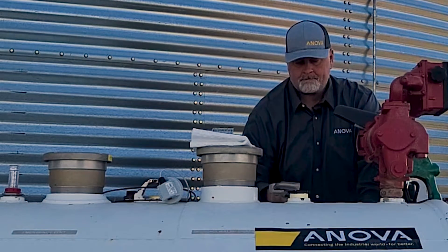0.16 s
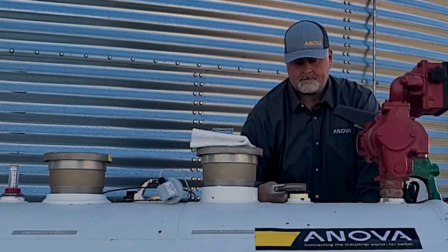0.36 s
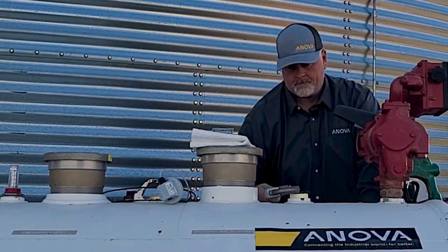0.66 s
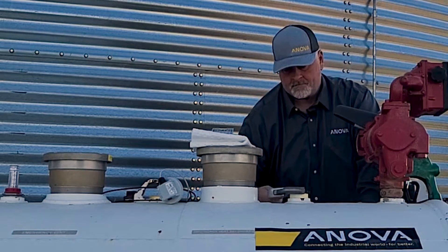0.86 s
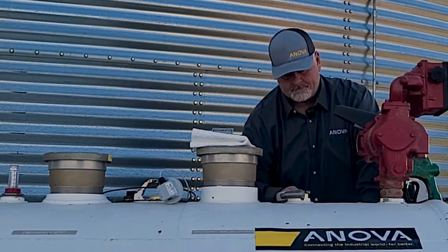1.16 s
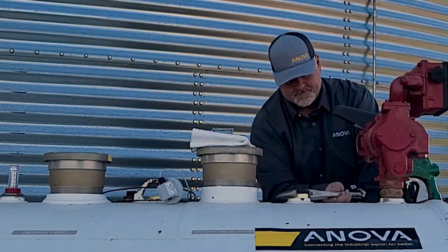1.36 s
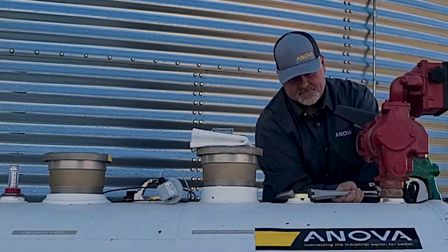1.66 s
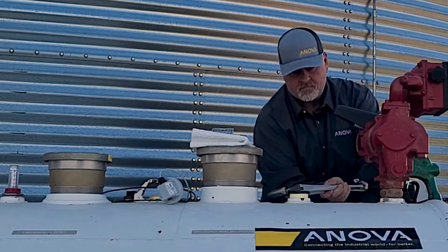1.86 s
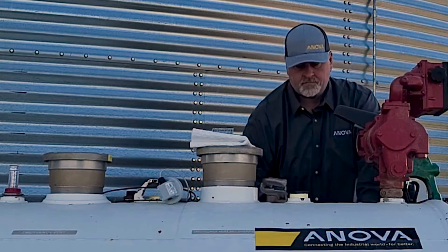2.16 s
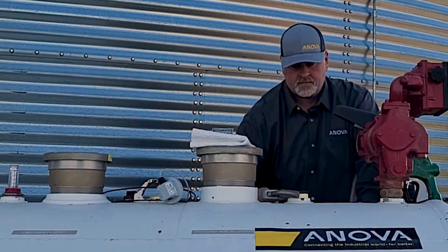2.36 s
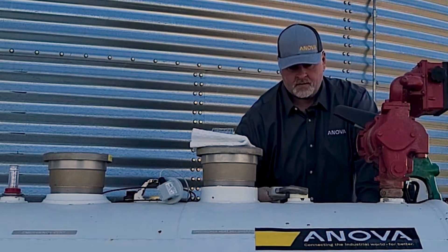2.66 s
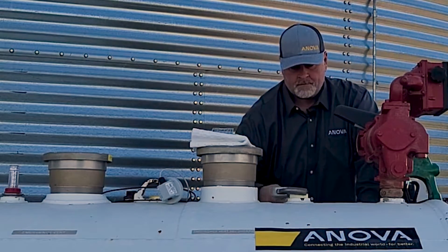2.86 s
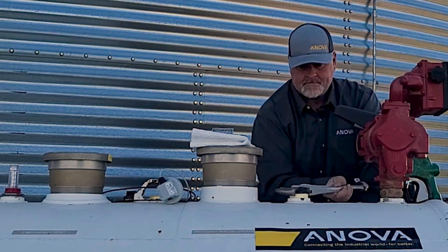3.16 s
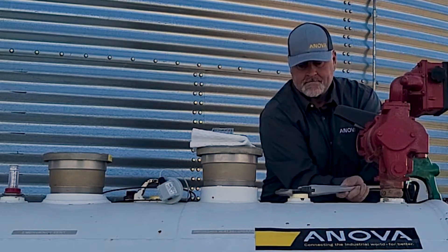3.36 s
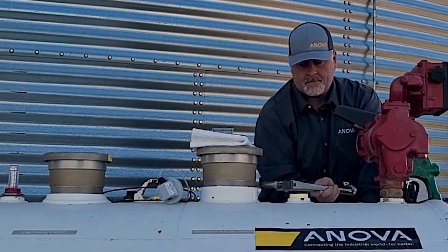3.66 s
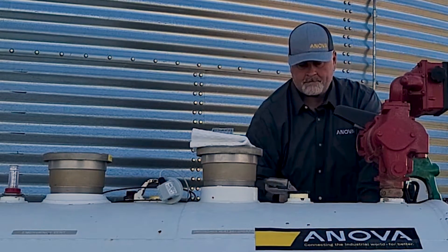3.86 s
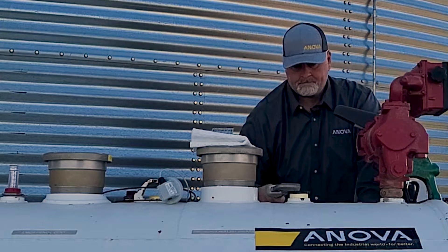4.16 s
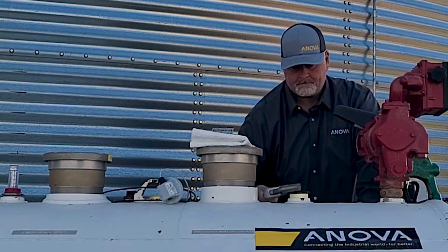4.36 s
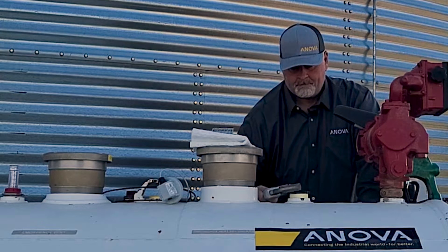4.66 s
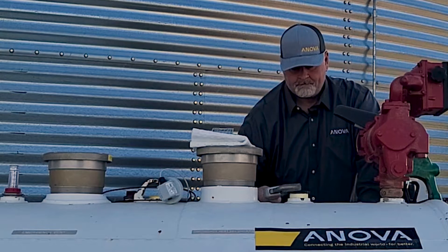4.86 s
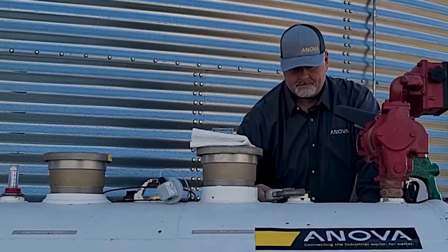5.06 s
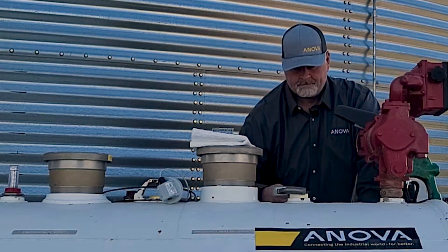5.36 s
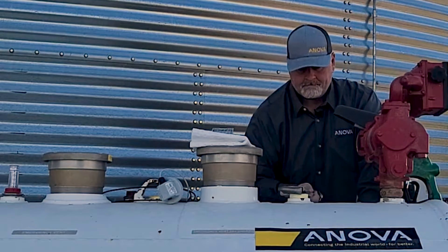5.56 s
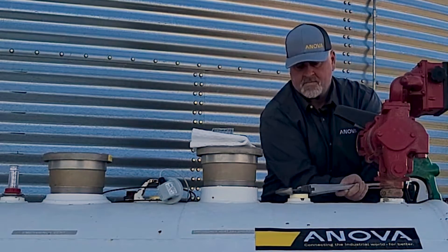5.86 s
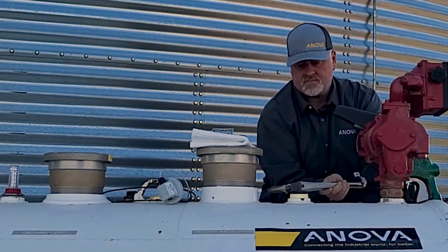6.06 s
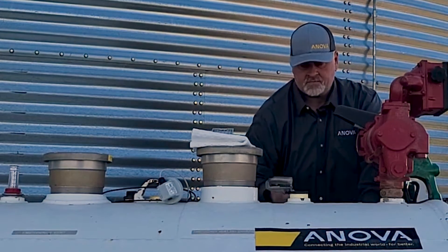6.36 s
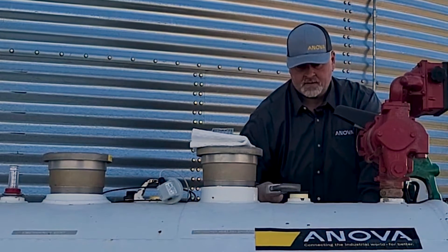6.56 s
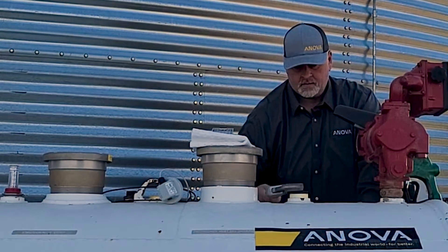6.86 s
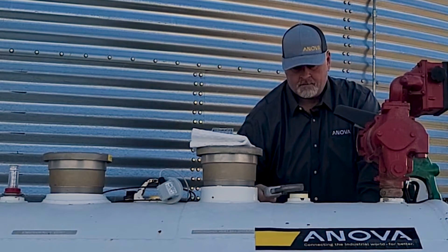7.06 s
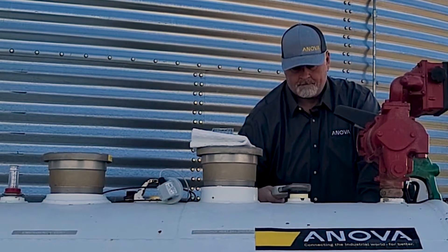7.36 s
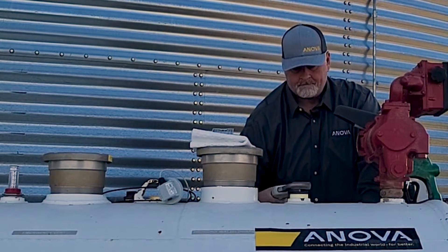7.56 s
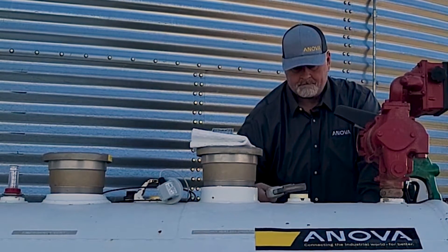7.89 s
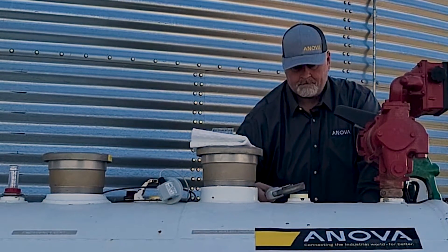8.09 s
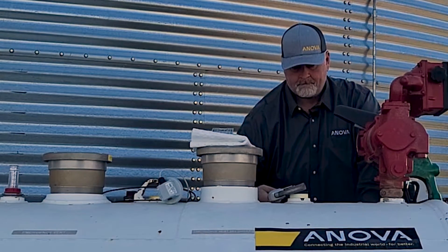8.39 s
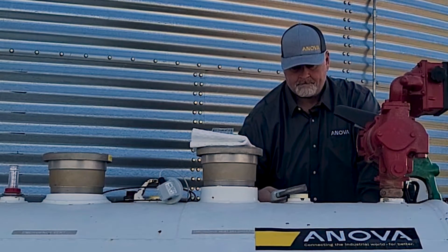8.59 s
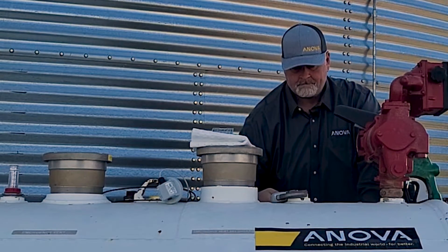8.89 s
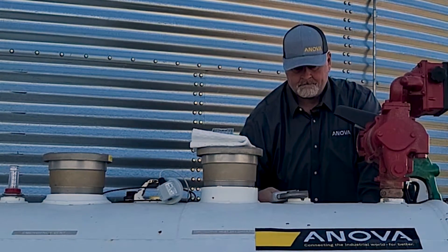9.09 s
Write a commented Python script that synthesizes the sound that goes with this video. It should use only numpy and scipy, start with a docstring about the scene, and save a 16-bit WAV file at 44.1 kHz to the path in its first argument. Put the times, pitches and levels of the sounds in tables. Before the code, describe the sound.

Dull booming metal knocks and loose wrench rattles come in uneven bursts over low wind thumps, then a stuck thread bangs loudly through the tank.

```python
"""Outdoors beside a corrugated steel wall, a pipe wrench tightens an adapter on top of a steel fuel tank.
Each bite knocks through the fitting and excites the modes of the tank shell, while the teeth scrape.
The loose jaw and handle rattle and ring, and the adjusting nut snaps as a click in two narrow resonances.
An earlier slip of the thread dies away at the start; at the end the loaded thread bangs three times.
Filtered noise gives the gusts that buffet the microphone and the quiet, steady hum and hiss."""
import sys
import numpy as np
from scipy import signal
from scipy.fft import rfft, irfft
from scipy.io import wavfile
from scipy.ndimage import uniform_filter1d

SR = 44100
rng = np.random.default_rng(int(sys.argv[2]) if len(sys.argv) > 2 else 0)


def waveform_to_disk(signal):
    """Save audio, clipped to [-1, 1], as 16-bit WAV at the path in sys.argv[1]."""
    frames = np.transpose(np.atleast_2d(signal))
    scaled = np.clip(frames, -1, 1) * 32767
    samples = np.round(scaled).astype(np.int16)
    wavfile.write(sys.argv[1], SR, samples)


N = 407043


def undb(db):
    """Level: decibels to amplitude gain."""
    return 10 ** (np.asarray(db) / 20)


def unit(x):
    """Normalisation: scale to rms 1."""
    return x / np.sqrt(np.mean(x ** 2) + 1e-20)


def at(points, hz):
    """Interpolation: read (frequency, value) points on a logarithmic frequency axis."""
    point_hz, values = np.transpose(points)
    return np.interp(np.log(np.maximum(hz, 1)), np.log(point_hz), values)


def colour(x, points):
    """Minimum-phase filtering: the folded cepstrum gives a causal filter of the (Hz, dB) shape."""
    size = 4096
    log_gain = at(points, np.fft.rfftfreq(size, 1 / SR)) * np.log(10) / 20
    cepstrum = irfft(log_gain)
    cepstrum[1:size // 2] *= 2
    cepstrum[size // 2 + 1:] = 0
    impulse_response = irfft(np.exp(rfft(cepstrum)))
    return signal.fftconvolve(x, impulse_response)[:len(x)]


def add(out, start_s, x):
    """Superposition: mix x into out from a time that may lie before the start."""
    i = int(start_s * SR)
    x, i = x[max(-i, 0):], max(i, 0)
    out[i:i + len(x)] += x[:max(N - i, 0)]


def fading_bands(decay, rise_s, size):
    """Dispersion and damping: half-octave masks and the envelope by which each builds up and decays."""
    octaves = np.log2(np.maximum(np.fft.rfftfreq(size, 1 / SR), 1))
    centres = np.arange(12, 29)[:, None] / 2  # octaves above 1 Hz
    masks = np.maximum(1 - 2 * abs(octaves - centres), 0)
    t = np.arange(size) / SR
    hz = 2 ** centres
    # bending waves are slow at low pitch, so the lows bloom late
    bloom = 1 - np.exp(-t / (rise_s + 2.0 / hz))
    fade = np.exp(-np.log(1000) * t / at(decay, hz))
    return masks, bloom * fade


def ring(modes, bands, modes_db, tick_db, blur):
    """Modal superposition: one contact gives a tick, a wash of crowded modes and clear modes above it."""
    masks, fades = bands
    size = fades.shape[1]
    t = np.arange(size) / SR
    noise_bands = irfft(masks * rfft(rng.standard_normal(size)))
    wash = (noise_bands * fades).sum(axis=0)
    hz, db, t60 = np.transpose(modes)[:, :, None]
    # every contact point favours other modes
    favour_db = 2 * rng.standard_normal(hz.shape)
    # the shifting grip makes each pitch wander, by the share blur, in steps of 256 samples
    steps = rng.standard_normal((len(hz), size // 256))
    wander = 1 + blur * np.repeat(steps, 256, axis=1)
    turns = np.cumsum(hz * wander, axis=1) / SR + rng.random(hz.shape)
    swing = np.sin(2 * np.pi * turns) * np.exp(-np.log(1000) * t / t60)
    clear_modes = (undb(db + modes_db + favour_db) * swing).sum(axis=0)
    tick = undb(tick_db) * (t == 0)
    return wash + clear_modes + tick


LEAD = 2048  # samples of light touches before each bite


def chatter(x, length_s, rate_hz):
    """Stick-slip friction: light touches swell up to the bite, then uneven contacts go on for length_s."""
    t = (np.arange(len(x)) - LEAD) / SR
    touched = rng.random(len(x)) < rate_hz / SR
    force = undb(4 * rng.standard_normal(len(x)))
    swell_s = np.clip(0.51 * length_s, 1e-4, .009)
    swell = np.where(t < 0, 0.34 * np.exp(np.minimum(t, 0) / swell_s), 1)
    contacts = touched * (t < length_s) * force * swell
    contacts[LEAD] = 1.37  # the bite itself
    return signal.fftconvolve(x, contacts)[:len(x)]


def tilt(hz, hardness_db, range_hz):
    """Contact stiffness: a harder contact is brighter, by hardness_db per octave within the range."""
    return hardness_db * np.log2(np.clip(hz, *range_hz) / range_hz[0])


SHELL_RANGE_HZ = (163, 1360)  # where hardness tilts the sound of the shell
FITTING_OCTAVES = 0.45  # standard deviation of the fitting's resonance curve


def shell_colour(base, hardness_db, grip_db, fitting_hz):
    """Transmission through a resonator: hardness tilts the blow and grip raises the fitting's resonance."""
    hz = np.geomspace(40, 16000, 160)
    resonance = np.exp(-.5 * (np.log2(hz / fitting_hz) / FITTING_OCTAVES) ** 2)
    gain_db = at(base, hz) + tilt(hz, hardness_db, SHELL_RANGE_HZ) + grip_db * resonance
    return np.c_[hz, gain_db]


def at_level(x, level_db, length_s, lead):
    """Short-time level: set the rms of a blow over its chatter and the 45 ms after it."""
    head = x[lead:lead + int((max(length_s, 0) + .045) * SR)]
    return x * undb(level_db) / np.sqrt(np.mean(head ** 2))


def echo(x, lag_s, db):
    """Specular reflection: the sound and one delayed, weaker copy."""
    delayed = np.pad(x, (int(lag_s * SR), 0))[:len(x)]
    return x + undb(db) * delayed


# slips of the loaded thread: start_s, level_db, hardness_db_per_octave, grip_db, fitting_hz
THREAD_SLIPS = [(-.13, -16, -3, 9.5, 400), (8.293, -27.5, -1.5, -9.5, 574), (8.713, -21, -1.5, -15.5, 521),
                (8.876, -13, 2.5, 1.5, 560)]
# modes of the tank shell and fitting: pitch_hz, relative_level_db, t60_s
SHELL_MODES = [(205, 0, .6), (414, -6, .5), (517, -1, .5), (609, -6, .45), (675, -6, .45), (795, -5, .45),
               (827, -7, .45), (941, -7, .5), (1034, -4, .5), (1097, -4, .4), (1489, 0, .3), (1830, -7, .2),
               (2003, -9, .2), (2402, -6, .25), (2624, -5, .3)]
# decay of the shell's crowded modes: frequency_hz, t60_s
FREE_SHELL_DECAY = [(130, 0.71), (300, 0.74), (600, 0.58), (1000, 0.5), (1600, 0.3), (3000, 0.17),
                    (5000, 0.16), (9000, 0.24)]
# spectral shape of a bang: frequency_hz, gain_db
BANG_COLOUR = [(50, -20.5), (85, -10.5), (130, 6), (205, 5), (290, 1), (430, 7.5), (680, 2.5), (950, 8.5),
               (1300, -4.5), (2400, -3.5), (3200, -6), (4200, -25), (5000, -25), (8000, -46), (12000, -52)]


def slips():
    """Sudden release: the thread lets go, the wall reflects the bang and the hollow tank rings on."""
    out = np.zeros(N)
    bands = fading_bands(FREE_SHELL_DECAY, rise_s=0.0011, size=49152)
    hollow_t60 = [(200, 0.3), (500, 2.0), (950, 1.94), (1500, 1.2), (3000, 0.78), (4500, 0.33)]  # Hz, s
    hollow = fading_bands(hollow_t60, rise_s=.01, size=49152)
    for start_s, level_db, hardness_db, grip_db, fitting_hz in THREAD_SLIPS:
        bang = ring(SHELL_MODES, bands, modes_db=-21.0, tick_db=22.0, blur=0.00057)
        bang = echo(bang, lag_s=0.019, db=-13.5)
        linger = ring(SHELL_MODES, hollow, modes_db=-19, tick_db=0, blur=.002)
        shape = shell_colour(BANG_COLOUR, hardness_db, grip_db, fitting_hz)
        blow = colour(bang + undb(-18.5) * linger, shape)
        add(out, start_s, at_level(blow, level_db, length_s=0, lead=0))
    return out


# spectral shape of the distant outdoor hum and microphone hiss: frequency_hz, relative_level_db (per Hz)
AIR_COLOUR = [(20, -1.5), (60, 6), (130, 1.5), (200, 4), (280, -8.5), (500, -14), (1000, -22.5),
              (2200, -31), (3200, -24), (6000, -26.5), (8000, -31), (12000, -31.5), (15500, -31.5)]
AIR_DB = -61  # rms level


def air():
    """Stationary noise: steady distant hum and hiss."""
    return undb(AIR_DB) * unit(colour(rng.standard_normal(N), AIR_COLOUR))


# gusts on the microphone: peak_s, swell_and_fall_s (time constant), level_db
WIND_GUSTS = [(.335, 0.089, -40), (1.3, 0.13, -55), (3.64, .025, -49), (4.1, 0.065, -36),
              (4.302, 0.0085, -32), (4.512, 0.01, -35.5), (5.21, 0.0083, -38), (5.345, 0.014, -29),
              (5.45, 0.099, -36.5), (6.091, 0.021, -25), (6.218, 0.039, -33.5), (6.372, 0.057, -23.5),
              (7.051, 0.024, -37.5), (7.264, 0.036, -22.5), (7.5, 0.053, -36.5), (7.64, 0.0086, -31),
              (7.762, 0.029, -24.5), (9.17, 0.034, -30.5)]
# spectral shape of the buffeting: frequency_hz, relative_level_db
BUFFET_COLOUR = [(15, -23), (28, -1), (50, 7), (75, 2.5), (110, -11.5), (180, -30), (400, -46.5),
                 (1000, -78.5)]
BREEZE_DB = -69  # between the gusts


def wind():
    """Turbulent pressure: eddies press on the microphone in low buffets over a light breeze."""
    eddies = unit(colour(rng.standard_normal(N), BUFFET_COLOUR))
    # even out the level over 60 ms, so that the gusts set it
    eddies /= np.sqrt(uniform_filter1d(eddies ** 2, int(.06 * SR)) + .02)
    t = np.arange(N) / SR
    gain = undb(BREEZE_DB)
    for peak_s, swell_s, level_db in WIND_GUSTS:
        gain = gain + undb(level_db) / np.cosh(np.clip((t - peak_s) / swell_s, -20, 20))
    return eddies * gain


# knocks of the jaw on the fitting; a firm grip brings out the fitting's resonance, a loose one leaves it out:
# start_s, chatter_length_s, level_db, hardness_db_per_octave, grip_db
JAW_KNOCKS = [(.002, 0, -32.5, -6, 3), (.05, 0, -31.5, -3.5, 3), (.155, 0.015, -36, -3.5, 5.5),
              (.728, 0.00027, -41.5, -3.5, 1), (.742, 0.0061, -37, -8.5, 14), (.907, 0.021, -44, -6.5, 1.5),
              (1.092, 0.015, -32.5, 0, 2), (1.186, 0, -36, -7, 2.5), (1.3, .19, -45.5, -3.5, -2.5),
              (1.76, 0.029, -38, -8, 2), (1.82, 0.001, -40, -14.5, -17), (1.887, 0, -41, -7, 1),
              (2.362, 0.01, -38.5, -4.5, 14), (2.447, 0.0072, -23.5, 2, 2), (2.535, 0.026, -30, -8.5, 13.5),
              (2.63, 0.054, -40, -6, -9), (2.713, 0.011, -24, -6, 14), (2.96, 0.0087, -40.5, -4.5, 1),
              (3.495, 0, -43, -9, -6), (3.528, 0.0017, -43.5, -12, -7.5), (3.584, 0.0088, -50, 2.5, -15),
              (3.802, .002, -29.5, 7.5, -5), (3.805, 0, -25, -7.5, 13.5), (4.044, 0.0098, -33, -5.5, 4.5),
              (4.497, 0.027, -51.5, -13, 0.5), (4.796, 0.013, -35, -1, 14), (4.995, 0.02, -41, -6, -1),
              (5.385, .03, -32.5, -9, 3.5), (5.485, 0.0055, -38, -10, -12),
              (5.732, 0.0098, -52.5, 2.5, 12.5), (5.935, 0.041, -36.5, -19, 9),
              (6.01, .056, -41.5, -7.5, -18.5), (6.545, 0.023, -29, -13, 8.5),
              (6.752, 0.0021, -31.5, -8, 10), (7.123, .008, -39.5, -2.5, 19), (7.215, .02, -43, -12, 12),
              (7.425, .006, -48, 0.5, 23), (7.45, 0.01, -36, -2.5, 20), (7.486, 0.034, -27, -9, 8.5),
              (7.935, 0.002, -48, -13, 8.5)]
# decay of the shell while the wrench and hand lean on it: frequency_hz, t60_s
HELD_SHELL_DECAY = [(130, 0.56), (300, 0.59), (480, 0.61), (750, 0.4), (1100, 0.42), (1600, 0.17)]
# spectral shape of a knock: frequency_hz, gain_db
BITE_COLOUR = [(45, -32.5), (85, -12), (130, -3.5), (195, 1), (290, 0.5), (400, 2), (520, 0.5), (680, -0.5),
               (900, 6), (1250, -5.5), (1500, -11), (1800, -22.5), (4000, -70.5)]
FITTING_HZ = 472  # resonance of the gripped fitting under a soft contact
# a contact harder than this (dB per octave) raises the resonance by so many octaves per dB
STIFFEN_FROM_DB, STIFFEN_OCTAVES = -4, 0.093


def knocks():
    """Structure-borne sound: each bite of the jaw passes through the fitting and booms in the shell."""
    out = np.zeros(N)
    bands = fading_bands(HELD_SHELL_DECAY, rise_s=0.0042, size=24576)
    for start_s, length_s, level_db, hardness_db, grip_db in JAW_KNOCKS:
        shell = ring(SHELL_MODES, bands, modes_db=-22, tick_db=24, blur=0.016)
        stiffening = STIFFEN_OCTAVES * max(hardness_db - STIFFEN_FROM_DB, 0)
        fitting_hz = FITTING_HZ * 2 ** stiffening
        shell = colour(shell, shell_colour(BITE_COLOUR, hardness_db, grip_db, fitting_hz))
        knock = chatter(shell, length_s, rate_hz=300)
        add(out, start_s - LEAD / SR, at_level(knock, level_db, length_s, LEAD))
    return out


# modes of the handle: pitch_hz, relative_level_db
HANDLE = [(1497, -3.5), (2060, -1), (2090, -11.5), (3230, -20), (3530, -19.5), (4685, -9.5), (6620, -9),
          (8090, -19.5), (12010, 3.5)]
WRENCH_T60_S = 0.086
# decay of the scrape's echoes: frequency_hz, t60_s
ECHO_DECAY = [(1300, 0.29), (3000, 0.21), (6000, 0.18), (14000, 0.043)]
# spectral shape of the scraping teeth: frequency_hz, gain_db
TEETH_COLOUR = [(600, -21.5), (1400, 6), (1700, -1.5), (2400, 4), (3300, -1), (4000, -5.5), (4800, -5),
                (5500, -11.5), (6500, -23.5), (7800, -26), (12000, -29.5)]
# level relative to the knock at 0 dB grip, and the dB that each dB of grip takes off it
SCRAPE_DB, SCRAPE_PER_GRIP = -21.5, 0.28


def scrapes():
    """Friction: the teeth skid at each knock, louder for a loose grip; the pressed wrench hardly rings."""
    out = np.zeros(N)
    bands = fading_bands(ECHO_DECAY, rise_s=0.001, size=16384)
    modes = [(hz, db, WRENCH_T60_S) for hz, db in HANDLE]
    for start_s, length_s, knock_db, _, grip_db in JAW_KNOCKS:
        teeth = ring(modes, bands, modes_db=-18, tick_db=17.5, blur=.008)
        scrape = chatter(colour(teeth, TEETH_COLOUR), length_s, rate_hz=400)
        level_db = knock_db + SCRAPE_DB - SCRAPE_PER_GRIP * grip_db
        add(out, start_s - LEAD / SR, at_level(scrape, level_db, length_s, LEAD))
    return out


# rattles of the loose jaw and handle: start_s, chatter_length_s, level_db, hardness_db_per_octave,
# balance_db (added to the jaw and taken off the handle), ring_over_scrape_db
WRENCH_RATTLES = [(.002, 0.033, -55, -10.5, -16, -4), (0.058, 0.054, -52.5, -4.5, -11, -6.5),
                  (0.721, 0.034, -48, -1, -6, -1), (.907, .02, -62, -3, -8, -5),
                  (1.763, 0.037, -52.5, -12, 10, -19), (1.983, 0.016, -61, -2, 12, -13),
                  (2.375, 0.027, -45, -13.5, 9.5, 5), (2.53, 0.028, -41.5, -5.5, 0.5, 2),
                  (2.552, 0.00089, -43, 1.5, 0, -6), (2.712, 0.0019, -48.5, -6.5, 0, -10),
                  (2.959, 0.0045, -58.5, -2.5, 14, -10), (3.453, 0.021, -53.5, -20, 4.5, -5),
                  (3.747, 0.021, -67.5, -5, 10, -9), (3.809, 0.025, -37.5, -1.5, 11, -0.5),
                  (4.038, 0.023, -47.5, -4.5, -19, 0), (4.117, .021, -48, -4, -7.5, -2),
                  (4.798, 0.0098, -47, -3, 2, 1), (4.997, 0.018, -43.5, 3.5, -4, 6.5),
                  (5.035, 0.0086, -47.5, 1.5, 2, -2.5), (5.233, 0.026, -59, -14, -4, -12),
                  (5.967, 0.013, -47, -11, 2, -3), (6.552, 0.0087, -49, -15, 5, 9.5),
                  (6.747, 0.032, -50.5, -0.5, -3, -5), (7.209, 0.0039, -69.5, -28, -5, 9),
                  (7.484, 0.016, -41, -6.5, -2, -3), (7.524, 0.048, -43, -3, -5, -1),
                  (7.755, 0.034, -43.5, -1.5, -3.5, 1.5), (7.943, 0.012, -53, -1.5, 0, 5.5)]
# modes of the hook jaw: pitch_hz, relative_level_db
JAW = [(3455, -6), (4640, -6.5), (6590, -10), (7542, -9), (9050, -10)]
# spectral shape of the wrench before the hardness tilt: frequency_hz, gain_db
STEEL_COLOUR = [(600, -9.5), (1350, 0.5), (1700, -7), (2100, 1), (2500, -7), (3200, 3.5), (3600, 5.5),
                (4050, -5), (4700, 0.5), (5500, -11.5), (6600, -7.5), (7200, -19.5), (8100, -7.5),
                (12000, -13.5), (12800, -26), (15500, -22.5)]
WRENCH_RANGE_HZ = (1800, 12000)  # where hardness tilts the sound of the wrench


def rattles():
    """Damped free vibration: the hook jaw and the handle chatter and ring, damped by the hand."""
    out = np.zeros(N)
    bands = fading_bands(ECHO_DECAY, rise_s=0.0017, size=16384)
    for start_s, length_s, level_db, hardness_db, balance_db, ring_db in WRENCH_RATTLES:
        jaw = [(hz, db + balance_db, WRENCH_T60_S) for hz, db in JAW]
        handle = [(hz, db - balance_db, WRENCH_T60_S) for hz, db in HANDLE]
        shape = [(hz, db + tilt(hz, hardness_db, WRENCH_RANGE_HZ)) for hz, db in STEEL_COLOUR]
        steel = ring(jaw + handle, bands, modes_db=ring_db, tick_db=26.5, blur=.004)
        rattle = chatter(colour(steel, shape), length_s, rate_hz=500)
        add(out, start_s - LEAD / SR, at_level(rattle, level_db, length_s, LEAD))
    return out


# snaps of the adjusting nut against the frame: start_s, pitch_hz, level_db
NUT_SNAPS = [(1.184, 2480, -52), (1.776, 3230, -46.5), (3.454, 3270, -38.5), (3.53, 3030, -43.5),
             (5.96, 3330, -32), (6.011, 3320, -46.5)]
FRAME_HZ, FRAME_DB = 1900, -8  # low resonance of the frame under a snap


def resonate(x, hz):
    """Resonance: a narrow band-pass around hz."""
    sos = signal.butter(2, [hz / 1.07, hz * 1.07], "band", fs=SR, output="sos")
    return signal.sosfilt(sos, x)


def snaps():
    """Impulse response: a dry click excites two narrow resonances, scattered briefly by the tank top."""
    out, t = np.zeros(N), np.arange(4096) / SR
    for start_s, pitch_hz, level_db in NUT_SNAPS:
        scatter = undb(-29.5) * rng.standard_normal(len(t)) * np.exp(-t / 0.021)
        impulse = (t == 0) + scatter
        click = resonate(impulse, pitch_hz) + undb(FRAME_DB) * resonate(impulse, FRAME_HZ)
        onset_rms = np.sqrt(np.mean(click[:256] ** 2))
        add(out, start_s, click * undb(level_db) / onset_rms)
    return out


def scene():
    """Superposition: wrench, tank and weather sum at one microphone."""
    return (knocks() + scrapes() + rattles() + snaps() + slips() + wind() + air())[None]


TOP_HZ = 15800


def record(dry):
    """Band limiting: a steep elliptic low-pass cuts the top."""
    low_pass = signal.ellip(10, .1, 80, TOP_HZ, fs=SR, output="sos")  # ripple and stop band in dB
    return signal.sosfilt(low_pass, dry)


dry = scene()
out = record(dry)
waveform_to_disk(out)
```